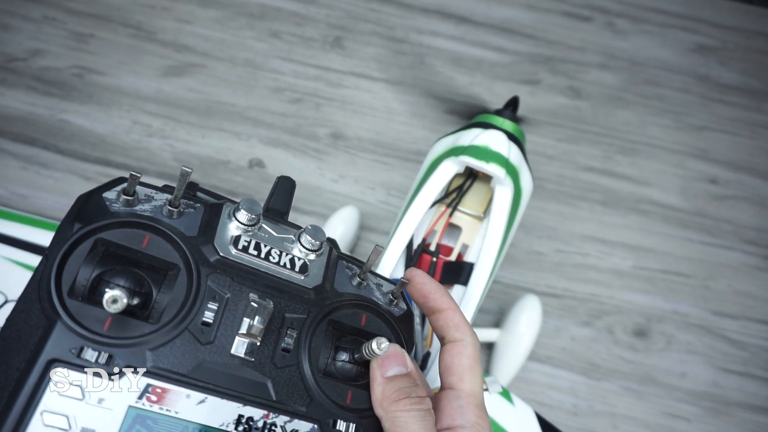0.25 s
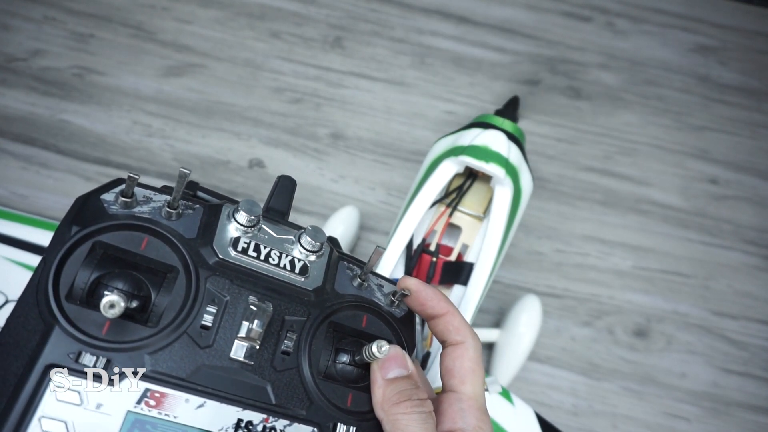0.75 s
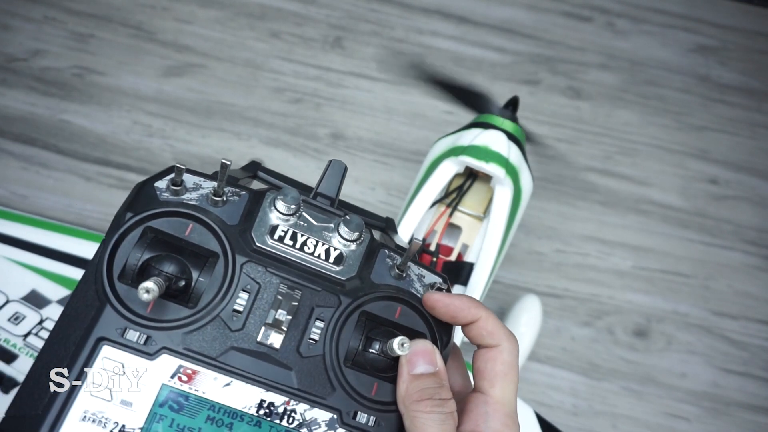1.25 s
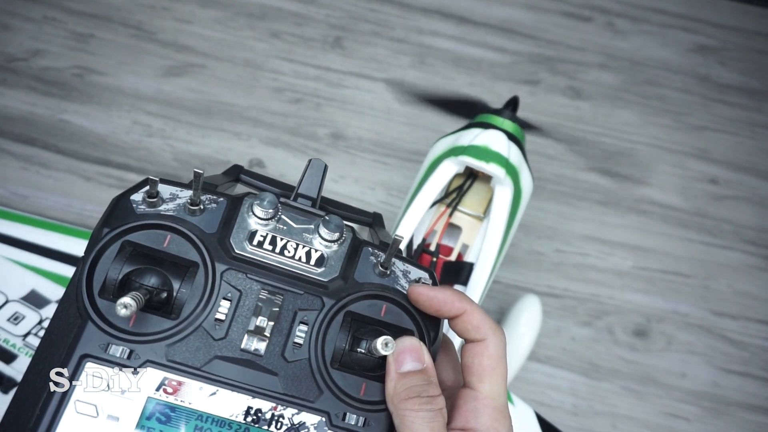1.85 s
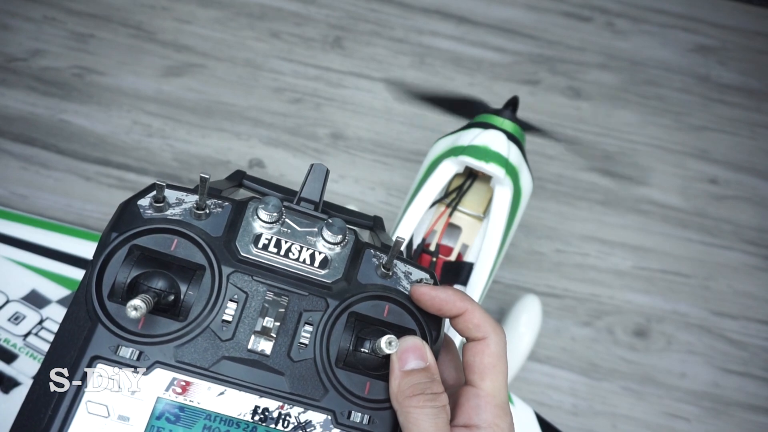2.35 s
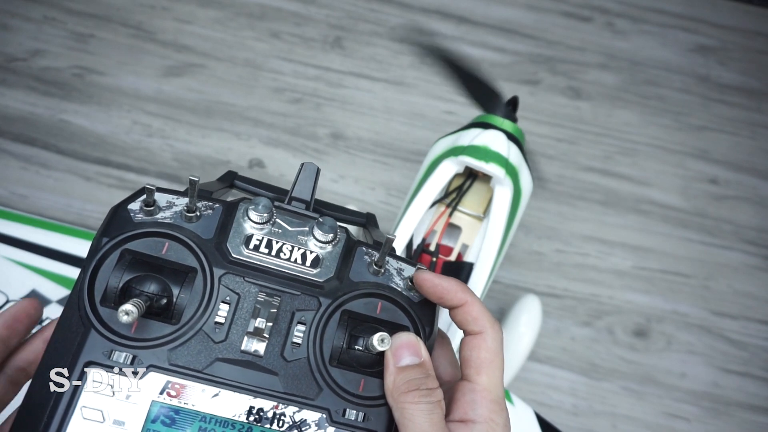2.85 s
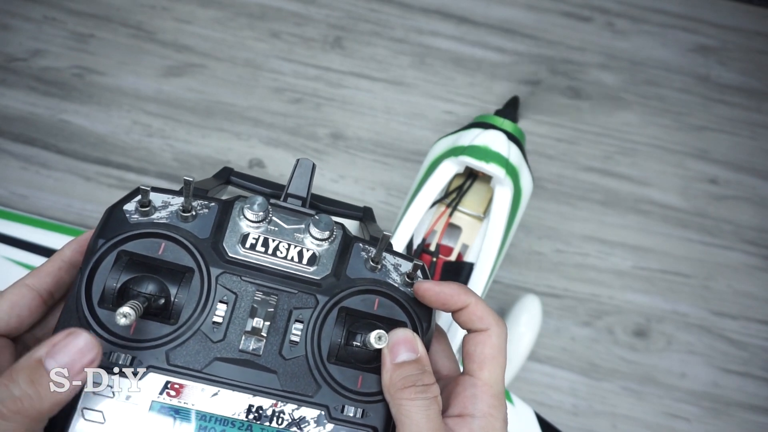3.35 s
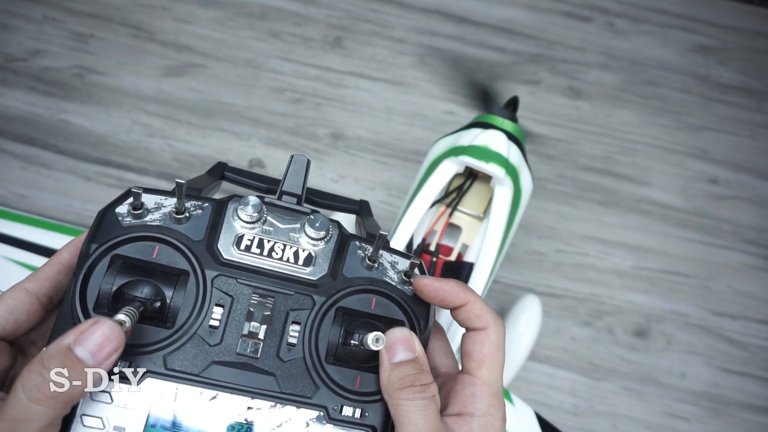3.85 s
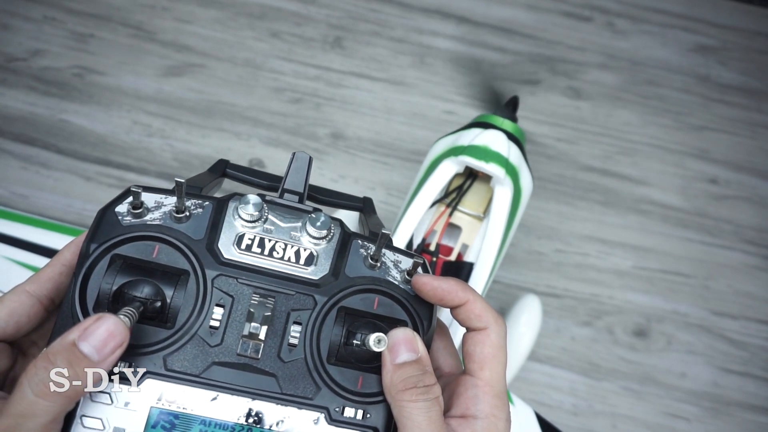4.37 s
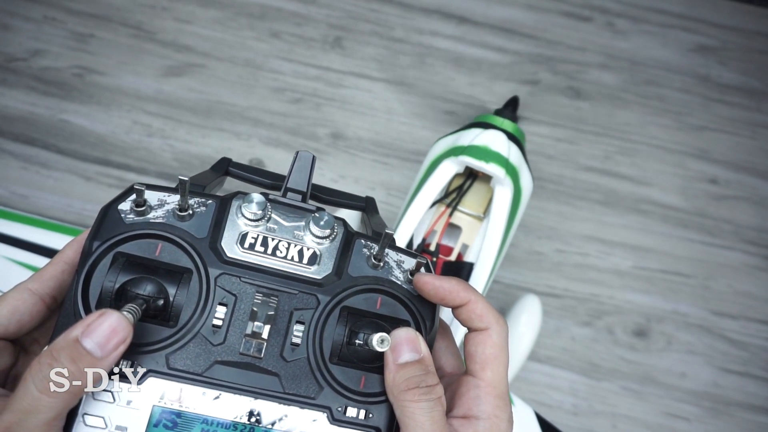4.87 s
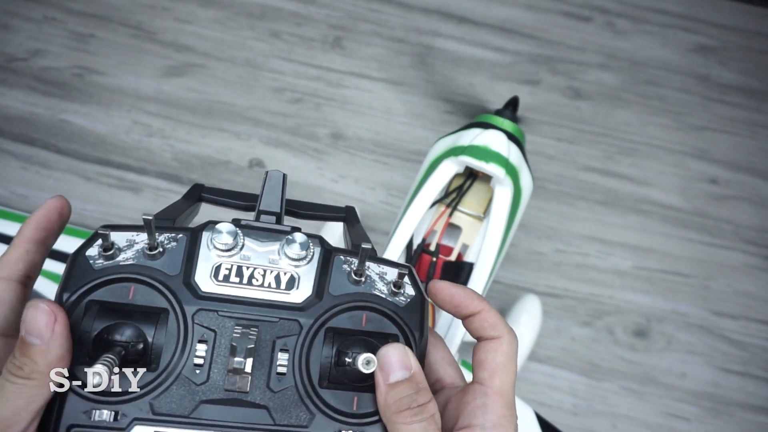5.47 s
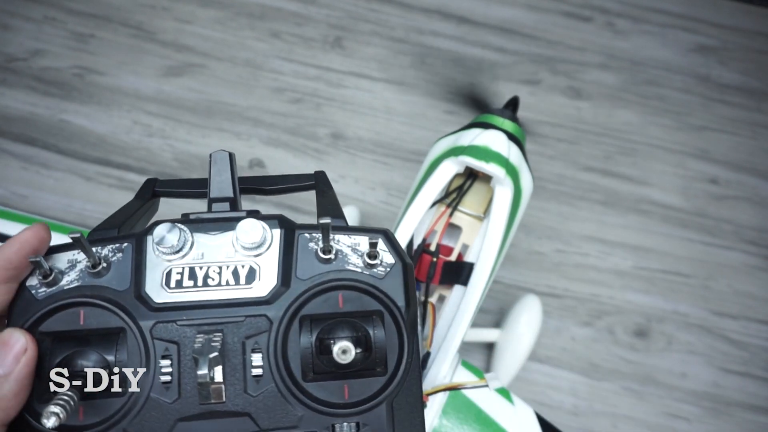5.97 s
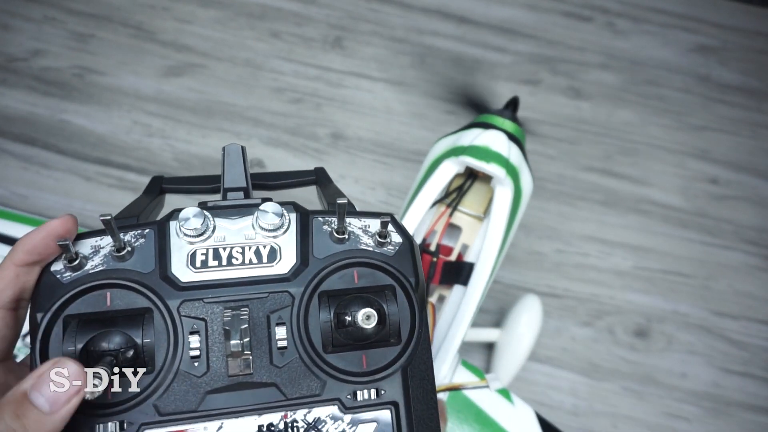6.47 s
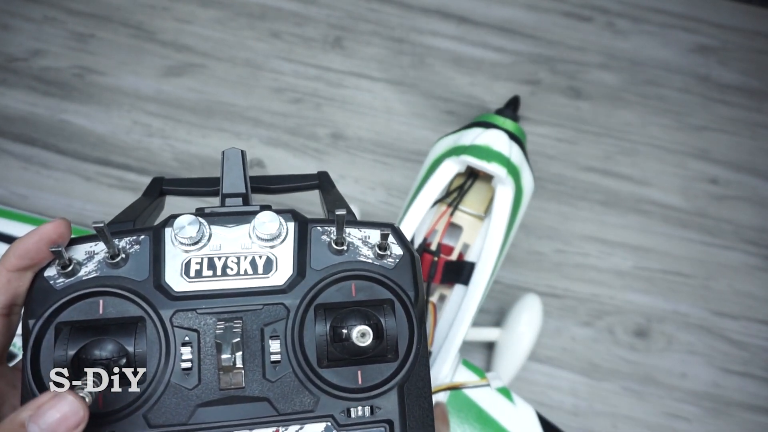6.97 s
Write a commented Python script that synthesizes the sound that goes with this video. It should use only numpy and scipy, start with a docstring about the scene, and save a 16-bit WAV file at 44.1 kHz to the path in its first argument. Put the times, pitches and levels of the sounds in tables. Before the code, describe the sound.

A piercing electronic whine with a fluttering edge sits over the rubbing, hissing whir of a small propeller, heard close indoors in stereo. Two sharp switch clicks each bring an abrupt brake, a rattling buzz and a quick rising run-up. Between them the motor coasts softly to a rough idle with a faint finger scuff. At the end the speed rises and stays high.

```python
"""In a room, close to the microphone, a model plane's brushless motor turns its propeller at low throttle.
The speed controller's switching makes the windings whine; blades and commutation put sidebands on the whine.
Twice a switch clicks: the motor brakes, chatters through a stall and runs up again.
After the first run-up it coasts down to an idle, and a finger scuffs; after the second the throttle opens further.
One shaft angle times the tones, the blades' swish and the bearing's ticks; filtered noise makes rub, hiss and air."""
import sys
import numpy as np
from scipy import signal
from scipy.fft import rfft, irfft
from scipy.io import wavfile
from scipy.ndimage import uniform_filter1d

SR = 44100
rng = np.random.default_rng(int(sys.argv[2]) if len(sys.argv) > 2 else 0)


def dump_mix(stems):
    """Bounce the given channels to the path in sys.argv[1] as a 16-bit WAV at rate SR."""
    frames = np.atleast_2d(stems).T  # one column per channel
    limited = np.clip(frames, -1, 1)  # hard clip at full scale
    pcm = np.round(limited * 32767).astype(np.int16)
    wavfile.write(sys.argv[1], SR, pcm)


N = 318402
T = np.arange(N) / SR  # time [s]

STEPS_PER_TURN = 42  # commutation steps in one turn of the shaft
TOP_HZ = 2078  # commutation rate at top speed

# how well the motor radiates its magnetic and ripple tones: f/Hz, level/dB
MOTOR_RADIATION = [(100, -70), (500, -22), (1400, -3), (1800, 1), (2600, 0), (3300, -12), (5000, -12),
                   (5550, -2), (6150, 1), (6500, -1), (8000, 0), (16000, 0)]
# resonances of the foam body (up to 836 Hz) and peaks of the room's comb (from 1660 Hz): f/Hz, width/Hz,
# lift/dB
BODY_AND_ROOM_MODES = [(593.4, 80, 11), (836, 35, 9.5), (271.5, 18, 9), (1660, 73, 7), (1880, 45, 6.5),
                       (2120, 78, 4.5), (2388, 110, 7), (2654, 37, 3.5)]
# relative spectrum of the clicks and the scuff: f/Hz, level/dB per Hz
CLICK_SPECTRUM = [(80, -55), (300, -27), (1000, -16), (1900, -2.5), (3700, 2), (5500, -6), (9000, 6),
                  (13500, -6.5), (16000, -12.5)]


def amp(db):
    """Amplitude ratio from level in decibels."""
    return 10 ** (np.asarray(db) / 20)


def evened(x):
    """Normalisation to an rms value of 1."""
    return x / np.sqrt(np.mean(abs(x) ** 2) + 1e-20)


def curves(table):
    """Linear interpolation in time: each column of a table at every sample."""
    s, *columns = np.transpose(table)
    return [np.interp(T, s, c) for c in columns]


def read(points, hz):
    """Linear interpolation of a spectrum on a log-frequency axis."""
    f, value = np.transpose(points)
    return np.interp(np.log(hz + 1), np.log(f), value)


def white():
    """White noise: two independent channels of equal power at all frequencies."""
    return rng.standard_normal((2, N))


def wander(rate_hz):
    """Low-pass random process: complex noise of narrow bandwidth, independent in each ear."""
    hz = np.fft.fftfreq(N, 1 / SR)
    z = rng.standard_normal((2, N)) + 1j * rng.standard_normal((2, N))
    return evened(np.fft.ifft(z / (1 + (hz / rate_hz) ** 2)))


def tone(turns, sway, sway_hz=5, apart=1.0):
    """Multipath interference: a line, shifted in phase between the ears, sways as the room's reflections shift."""
    s = np.arange(0, T[-1] + 1, 1 / sway_hz)
    steady = np.exp(1j * (2 * np.pi * rng.random() + np.array([[0], [apart]])))  # apart [rad]
    reflections = (rng.standard_normal((len(s), 2, 2)) @ [1, 1j]).T
    paths = steady + sway * reflections
    envelope = np.array([evened(np.interp(T, s, p)) for p in paths])
    return envelope * np.exp(2j * np.pi * turns) * np.sqrt(2)  # the real part has rms 1


def coloured(source, colour, modes=()):
    """Linear filtering: spectrum, resonances and fine room peaks, with coherence between the ears."""
    # likeness of the two ears: f/Hz, coherence/1
    likeness = [(60, 0.92), (600, 0.93), (1500, 0.64), (4000, 0.37), (15000, 0.1)]
    hz = np.fft.rfftfreq(N, 1 / SR)
    a, b = rfft(source)
    same = np.clip(read(likeness, hz), 0, 1)
    db = read(colour, hz)
    for f, width, lift in modes:
        db = db + lift / (1 + (2 * (hz - f) / width) ** 2)
    grid = np.arange(0, SR / 2, 28)
    db = db + 2 * np.interp(hz, grid, rng.standard_normal(len(grid)))  # room peaks, 2 dB rms at the grid points
    second = same * a + np.sqrt(1 - same ** 2) * b
    return evened(irfft(np.array([a, second]) * amp(db), N))


def commutation():
    """First-order lag: after each throttle move the speed closes in, partly fast and partly in a slow creep."""
    # throttle moves: t/s, commutation rate aimed at/Hz, time constant/s, share that creeps slowly/1
    moves = [(0, 1533, .16, 0), (.82, 200, .045, 0), (1.175, 1558, .22, 0), (1.35, 0, 1.85, 0),
             (2, 590, .15, .4), (2.94, 200, .03, 0), (3.237, 1558, .178, .035), (4.71, 2078, .14, .2)]
    start_hz, creep_s = 1400, .9
    hz = np.full(N, float(start_hz))
    for s, aim_hz, lag_s, creep in moves:
        i = round(s * SR)
        age = T[:N - i]
        remaining = (1 - creep) * np.exp(-age / lag_s) + creep * np.exp(-age / creep_s)
        hz[i:] = aim_hz + (hz[i] - aim_hz) * remaining
    return hz


def coasting():
    """Freewheeling without drive torque: 1 while the propeller coasts, 0 otherwise."""
    return np.interp(T, [1.35, 1.4, 2.08, 2.18], [0, 1, 1, 0])


def drive():
    """Exponential transients: gains of whine, scatter and ripple rise or die down to each new state."""
    # controller states: from t/s, whine level/dB, part scattered by the blades (re whine)/dB, ripple level/dB
    # in turn: low throttle, brake, stall, run-up, coast, drive cut, coast, idle, unsteady idle, idle,
    # brake, stall, pause, second try, run-up, low throttle, throttle opened, top speed
    states = [ (0, -11.5, -9, -36.5), (0.823, -30, -10, -60), (0.938, -10.5, -4.5, -55),
              (1.19, -11, -6.5, -35), (1.36, -29.5, -5, -64), (1.79, -50, -9.5, -66), (1.86, -28, -11, -54),
              (2.125, -20, -11, -38), (2.41, -23, -6, -37.5), (2.66, -20.5, -8, -35),
              (2.945, -24.5, -5, -55), (3.031, -10, 1, -52), (3.115, -23, -4, -55), (3.14, -12, -1.5, -48),
              (3.26, -13.5, -3, -39), (3.93, -10.5, -7, -33), (4.71, -11.5, -5.5, -38),
              (5.78, -15, -4, -36.5), ]
    rise_s, fall_s = 0.0021, 0.0077
    gains = amp(states[0][1:])[:, None] * np.ones(N)
    for s, *levels_db in states[1:]:
        i = round(s * SR)
        old, new = gains[:, i, None], amp(levels_db)[:, None]
        lag_s = np.where(new > old, rise_s, fall_s)
        gains[:, i:] = new + (old - new) * np.exp(-T[:N - i] / lag_s)
    return gains


def hunting():
    """Beating of two tones as the controller hunts for the rotor: the beat slows and ends as it locks on."""
    # hunts: t/s, initial offset of the two beating tones/Hz, time to lock/s
    hunts = [(.93, 164.4, 0.24), (3.025, 114, 0.22)]
    beat_decay_s = 0.17
    share, beat_hz = np.zeros((2, N))
    for s, hz, lock_s in hunts:
        i = round(s * SR)
        age = T[:N - i]
        share[i:] = np.exp(-(age / lock_s) ** 6)
        beat_hz[i:] = hz * np.exp(-age / beat_decay_s)
    return share, np.cumsum(beat_hz) / SR


def whine(shaft, speed, scatter_db=0, fuzz_db=-4, ear_phase=0.96):
    """Modulation sidebands: windings sing at the switching rate; blades and commutation modulate the note."""
    # drift of the controller's clock: t/s, switching rate f/Hz
    switching = [(0, 7640), (.8, 7639), (1.3, 7654), (2.9, 7655), (3.4, 7638), (5.5, 7638), (6.3, 7643),
                 (7.22, 7648)]
    # the microphone drifts through the whine's standing wave: t/s, left-right level/dB, level/dB
    standing_wave = [(0, -1, -5), (.13, -15, -3.5), (.38, -1, 5), (.75, -3, 0.5), (1.1, -6.5, -4),
                     (1.6, 0, 0), (2.3, 10.5, 0), (2.7, 5, -6), (3.63, 4.5, 2.5), (3.8, 9, -4.5),
                     (4.15, 2, 2), (4.75, 8.5, 0), (5.2, 17, 0), (5.57, 6.5, -1.5), (5.68, 2, 2.5),
                     (5.98, 4, -3.5), (6.4, 9, 0), (7.05, 14, 1.5), (7.22, 4, -2.5)]
    # sidebands from the turning blades: multiple of the blade rate/1, relative level/dB
    sidebands = [(-7, -15), (-6, -19), (-5, -15), (-4, -11), (-3, -5), (-2, -1), (-1, -2), (1, -9), (2, -8),
                 (3, -9), (4, -16), (5, -22), (6, -19), (7, -24)]
    # ripple tones: multiple of the switching rate/1, offset/shaft orders, relative level/dB
    ripple_tones = [(1, 42, -1), (1, -42, -4), (1, 21, -14), (1, 84, -17), (1, -84, -19), (1, -126, -10),
                    (1, -168, -10), (1, -210, -8), (2, -14, -17), (2, -42, -20)]
    full_swing = .93  # amplitude the rounded swells approach

    level, blades, ripple = drive()
    pan_db, place_db = curves(standing_wave)
    share, beat_turns = hunting()
    clock = np.cumsum(curves(switching)[0]) / SR
    carrier = np.sqrt(2) * np.exp(2j * np.pi * clock)
    beat = np.sqrt(1 - share ** 2) + 1j * share * np.sqrt(2) * np.cos(2 * np.pi * beat_turns)

    # the ears lie apart in the standing wave
    ears = amp(np.array([pan_db, -pan_db]) / 2)
    ears = ears / np.sqrt(np.mean(ears ** 2, 0)) * np.exp(1j * np.array([[0], [ear_phase]]))
    ears = ears + (.1 + .25 * speed ** 4) * wander(rate_hz=9)  # the note flutters more at speed
    out = level * amp(place_db) * ears * beat * carrier

    scatter = sum(amp(db) * tone(clock + 2 * k * shaft, sway=0.41, apart=1.79) for k, db in sidebands)
    scatter = np.sqrt(2) * evened(scatter)
    fuzz = carrier * wander(rate_hz=170)
    out += level * blades * (1 - 0.48 * share) * (amp(scatter_db) * scatter + amp(fuzz_db) * fuzz)
    out += level * amp(-30) * beat * tone(2 * clock, sway=0.4, sway_hz=20)  # the octave

    for m, k, db in ripple_tones:
        db = db - 25 * (1 - speed) ** 2 * max(abs(k) / STEPS_PER_TURN - 2, 0)  # the outer tones need speed
        turns = m * clock + k * shaft
        radiated_db = read(MOTOR_RADIATION, abs(np.gradient(turns)) * SR)
        out += ripple * amp(db + radiated_db) * tone(turns, sway=.7, sway_hz=20)
    # the loudest swells of the whine round off
    return out.real / (1 + (abs(out) / full_swing) ** 10) ** (1 / 10)


def rotor(shaft, step_hz):
    """Order-locked excitation: magnets pass stator teeth; the propeller's hum grows as a power of speed."""
    # how strongly the mount radiates the cogging tone: f/Hz, level/dB
    cogging = [(400, -65), (560, -42), (600, -42), (640, -45), (900, -38), (1080, -32), (1280, -38),
               (1420, -38), (1490, -42), (1520, -51), (1531, -51), (1539, -38), (1750, -32), (1920, -36),
               (1995, -46), (2030, -40), (2055, -37.5)]
    # overtones of the cogging tone, fading towards top speed: multiple/1, relative level/dB
    cog_overtones = [(2, -13), (4, -14)]
    # magnetic tones before radiation: shaft order/1, level under power at top speed/dB, level coasting/dB
    magnetic_tones = [(21, -39, -70), (28, -49, -54), (48, -64, -56), (63, -41, -68), (84, -48, -52)]
    # how well the airframe radiates the coasting motor's tones: f/Hz, level/dB
    coast_radiation = [(400, -6), (520, -2), (600, 9), (720, -4), (900, 4), (1080, -1), (1280, 4),
                       (1500, -3), (1850, -4)]
    # hum of the propeller and its unbalance at top speed: shaft order/1, level/dB
    hum_tones = [(2, -66), (3, -71.5), (4, -57), (5, -67), (6, -55), (7, -58.5), (8, -51.5), (11, -48),
                 (12, -45.5), (17, -49)]
    # partials of the rasp: multiple of the commutation rate/1, relative level/dB
    rasp_partials = [(1, 0), (1.5, -14), (2, -5), (2.5, -13), (3, -19), (4, -20)]

    steps, speed, free = STEPS_PER_TURN * shaft, step_hz / TOP_HZ, coasting()
    overtones = sum(amp(db) * tone(k * steps, sway=0.62, sway_hz=39.8) for k, db in cog_overtones)
    cog_gain = amp(read(cogging, step_hz) - 20 * free)  # 20 dB less while coasting
    cog = cog_gain * (tone(steps, sway=.45, sway_hz=44.7) + (1 - speed ** 2) * overtones)

    torque = np.clip(np.gradient(step_hz) * SR / 3000, 0, 1)  # from the acceleration
    load = speed ** 2 * (1 + 2 * torque)
    magnetic = 0
    for k, on_db, off_db in magnetic_tones:
        hz = k * step_hz / STEPS_PER_TURN
        powered = amp(on_db + read(MOTOR_RADIATION, hz)) * load
        level = powered + amp(off_db + read(coast_radiation, hz)) * free
        magnetic = magnetic + level * tone(k * shaft, sway=1.0, sway_hz=20)

    # the hum is the same in both ears
    hum = speed ** 6.6 * sum(amp(db) * tone(k * shaft, sway=1.1, sway_hz=14)[0] for k, db in hum_tones)

    # hard acceleration makes the cogging rasp, most where it meets the motor mount's resonance
    mount_db = [(400, -47), (700, -53), (900, -3.0), (1060, 5.0), (1300, -8.5), (1800, -11.0)]
    mount = amp(read(mount_db, step_hz))
    rasp = sum(amp(db) * tone(k * steps, sway=2, sway_hz=170 * k) for k, db in rasp_partials)
    return (cog + magnetic + hum + amp(-26) * torque * mount * rasp).real


def shaking():
    """Transient envelope: each fit of shaking starts abruptly, sags exponentially and stops."""
    # fits of shaking around a brake, stall and restart: t/s, length/s, level/dB before the sag
    fits = [(0.819, 0.11, -26.5), (0.942, 0.18, -24), (1.135, 0.24, -29), (2.933, .09, -32.5),
            (3.034, 0.072, -26.5), (3.133, 0.2, -27.5)]
    attack_s, sag_db_per_s, release_s = 0.0085, 32.5, 0.017
    level = np.zeros(N)
    for s, length, db in fits:
        age = np.maximum(T - s, 0)
        attack = np.minimum(age / attack_s, 1)
        release = np.exp(-np.maximum(age - length, 0) / release_s)
        level += attack * amp(db - sag_db_per_s * age) * release
    return level


def by_speed(law, speed):
    """Power law: noise amplitude grows as a power of the speed and drops when the motor coasts."""
    top_db, slope_db, coast_db = law
    return amp(top_db + slope_db * np.log10(speed) + coast_db * coasting())


def revolving(shaft, size=320):
    """Periodic surface roughness: the same small bumps of the bearing come round on every turn."""
    bumps = signal.resample(rng.standard_normal((2, size)), 16 * size, axis=1)
    return evened(bumps[:, (shaft % 1 * bumps.shape[1]).astype(int)])


def airframe(shaft, speed, knocks_per_s=550, run_db=-1):
    """Forced resonance: the running motor rubs and hisses; stalled, it knocks against its foam body."""
    # relative spectra of rubbing, stall chatter and hiss: f/Hz, level/dB per Hz
    run_spectrum = [(30, -38), (100, -32), (200, -19.5), (350, -5.5), (550, -2.5), (1000, 0.5), (2000, -2),
                    (2800, 1.5), (3600, -3.5), (6000, -15.5)]
    stall_spectrum = [(30, -55), (120, -44), (250, -10), (550, -1.5), (950, 6.5), (1400, 1.5), (2000, 0.5),
                      (2700, 0), (3300, -17.5), (6000, -44)]
    hiss_spectrum = [(1500, -40), (3000, -10.5), (4200, 7), (5300, 1.5), (6500, 5), (8500, 9), (9600, 3),
                     (10700, -9), (13000, -0.5), (14200, -5.5), (15400, 8), (16000, -20.5)]
    # the foam's main resonance, which the knocks of a stall ring hardest: f/Hz, width/Hz, lift/dB
    drum = [(598, 55, 5)]
    # resonances of the motor's bell in the hiss: f/Hz, width/Hz, lift/dB
    bell = [(4250, 130, 4), (4580, 130, 3.5)]
    # speed laws, rubbing before run_db: level at top speed/dB, slope/dB per tenfold speed, change coasting/dB
    rub_law = (-30.5, 20.7, -6)
    hiss_law = (-31, 20, -9.5)

    shake = shaking()
    knocks = (rng.random(N) < knocks_per_s / SR) * rng.uniform(0.41, 1, N)
    knocks = evened(signal.lfilter([1], [1, -np.exp(-1 / (0.0086 * SR))], knocks))  # each decays in 8.6 ms
    chatter = coloured(white() * (.5 + knocks), stall_spectrum, BODY_AND_ROOM_MODES + drum)

    swish = 1 + 0.12 * np.cos(4 * np.pi * shaft)  # two blades a turn
    rub = coloured(white() * swish + amp(-12) * revolving(shaft), run_spectrum, BODY_AND_ROOM_MODES)
    hiss_gain = by_speed(hiss_law, speed) + amp(-9.5) * shake
    hiss = coloured(white() * swish, hiss_spectrum, bell) * hiss_gain
    # the hiss leans to the second channel
    return amp(run_db) * by_speed(rub_law, speed) * rub + shake * chatter + hiss * amp([[-.7], [.7]])


def wash(speed):
    """Aerodynamic noise: the blades throw back a low rush of air that grows as a power of speed."""
    # relative spectrum of the thrown-back air: f/Hz, level/dB per Hz
    wash_spectrum = [(30, -42), (70, -17), (130, -18), (200, -9.5), (350, -2), (600, 4), (850, -4.5),
                     (1500, -19)]
    top_db, power = -40, 4.6
    return amp(top_db) * speed ** power * coloured(white(), wash_spectrum, BODY_AND_ROOM_MODES)


def bearing(shaft, tick_db=-49, decay=0.057, half_turn=.4):
    """Periodic impact: a dry tick once a turn, with a weaker one half a turn later."""
    turn = shaft - np.interp(1.518, T, shaft)  # a tick falls at 1.518 s
    ticks = np.exp(-(turn % 1) / decay)  # decay [turns]
    ticks = ticks + half_turn * np.exp(-((turn + .5) % 1) / decay)
    return amp(tick_db) * coloured(white() * ticks, [(2000, -12), (7000, -40), (11500, 10), (15500, 2)])


def room():
    """Stationary background noise: faint noise with the room's spectrum."""
    # relative spectrum of the room noise: f/Hz, level/dB per Hz
    room_spectrum = [(20, -20), (100, -1), (300, -1), (600, -38), (3000, 17), (8000, -17), (12000, -13),
                     (16000, -15)]
    return amp(-52.5) * coloured(white(), room_spectrum)


def switch(click_db=-1, snap_s=0.0018, ring_s=0.038, ring_db=-18, bounce_s=0.0032, bounce_db=-9):
    """Impulse response: a toggle snaps over, bounces once, and its plastic case rings briefly."""
    # switch clicks: t/s, level/dB before click_db
    clicks = [(.794, -8), (2.9085, -4.5)]
    # parts of one click: delay/s, level/dB, decay/s
    parts = (0, 0, snap_s), (bounce_s, bounce_db, snap_s), (0, ring_db, ring_s)
    blows = np.zeros(N)
    for s, db in clicks:
        for delay, part_db, decay in parts:
            age = T - s - delay
            blows += (age >= 0) * amp(db + click_db + part_db) * np.exp(-abs(age) / decay)
    return blows * coloured(white(), CLICK_SPECTRUM)


def hand():
    """Friction noise with exponential decay: a finger scuffs the transmitter's case."""
    # the scuff: t/s, decay/s, level/dB
    scuff = (2.252, .025, -40)
    s, decay, db = scuff
    return amp(db) * (T >= s) * np.exp(-abs(T - s) / decay) * coloured(white(), CLICK_SPECTRUM)


def scene():
    """Superposition: the motor's layers share one shaft angle and speed, over faint room noise."""
    # nearness of the microphone to the propeller: t/s, level on rubbing, hiss, chatter and wash/dB
    nearness = [(0, 0.5), (.8, .5), (2.1, -.5), (3.6, 0.5), (4.3, 0), (5, -2.5), (5.6, -1.5), (6.1, 1.5),
                (7.22, -0.5)]
    step_hz = uniform_filter1d(commutation(), size=600)  # the rotor's inertia rounds the corners
    shaft = np.cumsum(step_hz) / STEPS_PER_TURN / SR  # angle [turns]
    speed = step_hz / TOP_HZ
    air = amp(curves(nearness)[0]) * (airframe(shaft, speed) + wash(speed))
    motor = whine(shaft, speed) + rotor(shaft, step_hz) + air + bearing(shaft)
    return motor + room() + switch() + hand()


def record(dry):
    """Clipping and band limitation: full-scale limit, then a linear-phase low-pass."""
    edge_hz = 15800
    low_pass = signal.firwin(511, edge_hz, window=("kaiser", 9), fs=SR)
    return signal.oaconvolve(np.clip(dry, -1, 1), low_pass[None], "same")


dry = scene()
out = record(dry)
dump_mix(out)
```